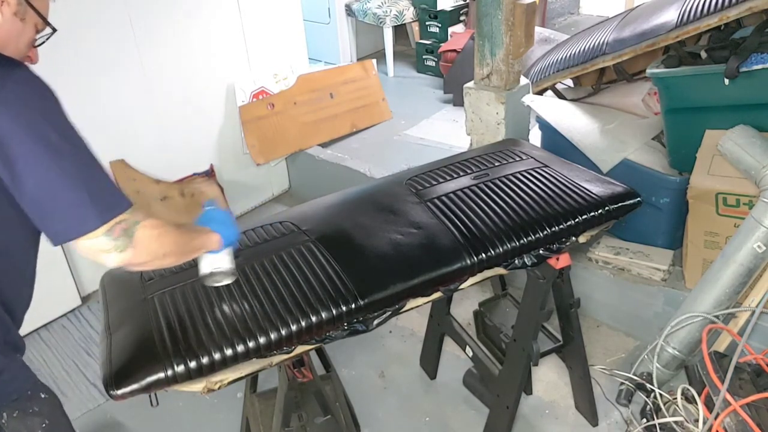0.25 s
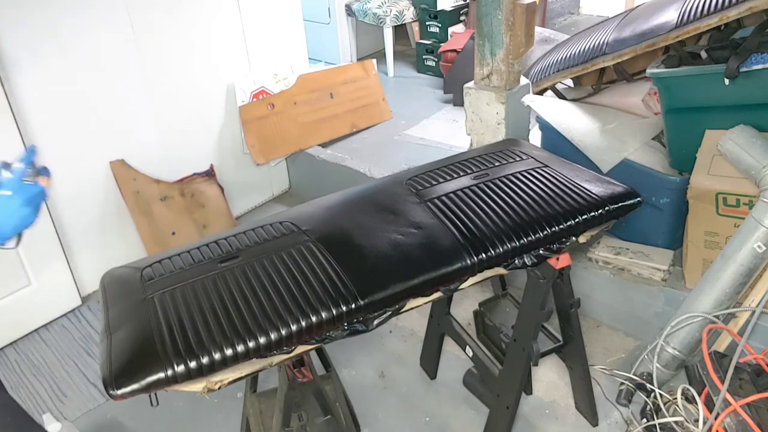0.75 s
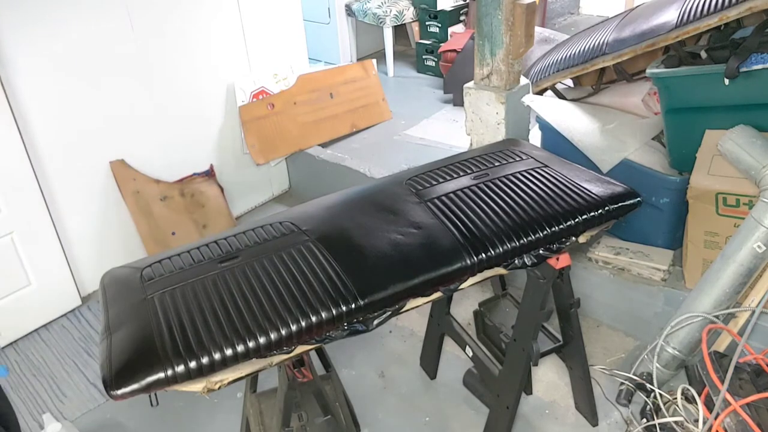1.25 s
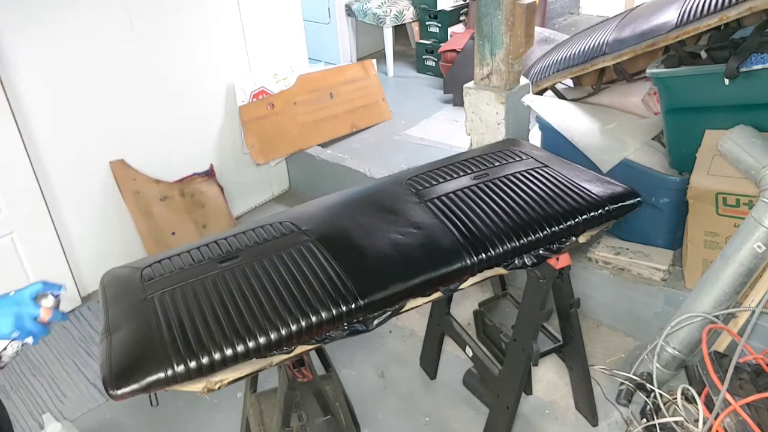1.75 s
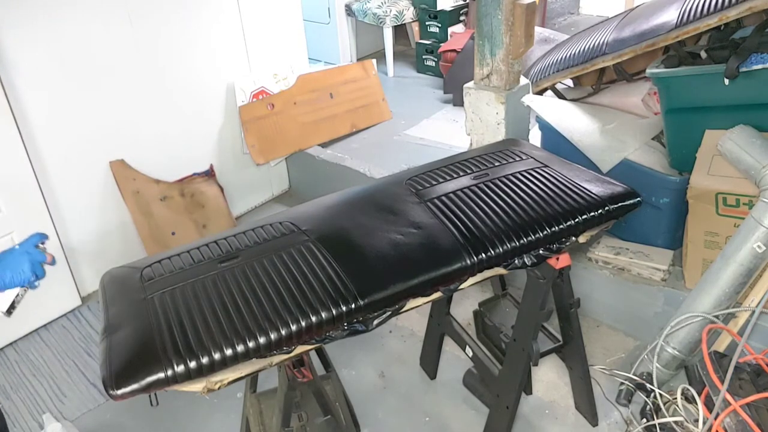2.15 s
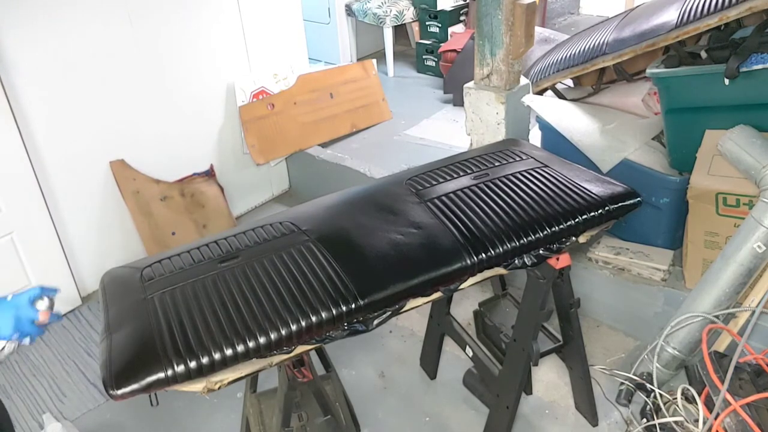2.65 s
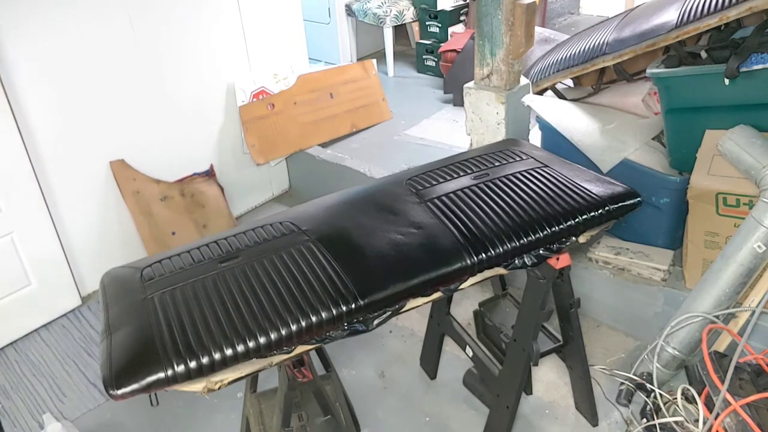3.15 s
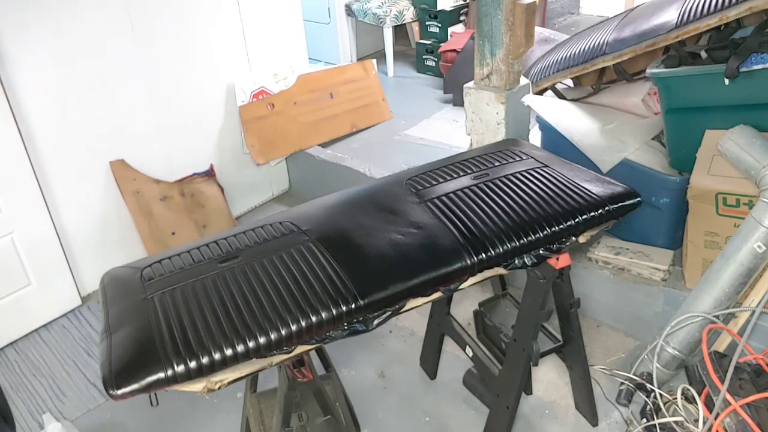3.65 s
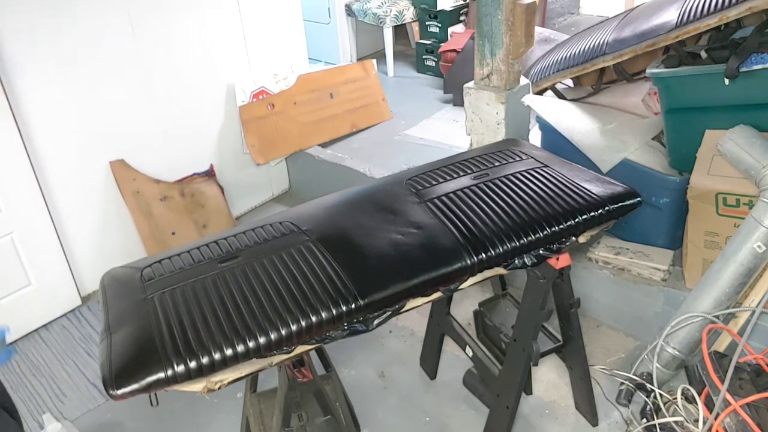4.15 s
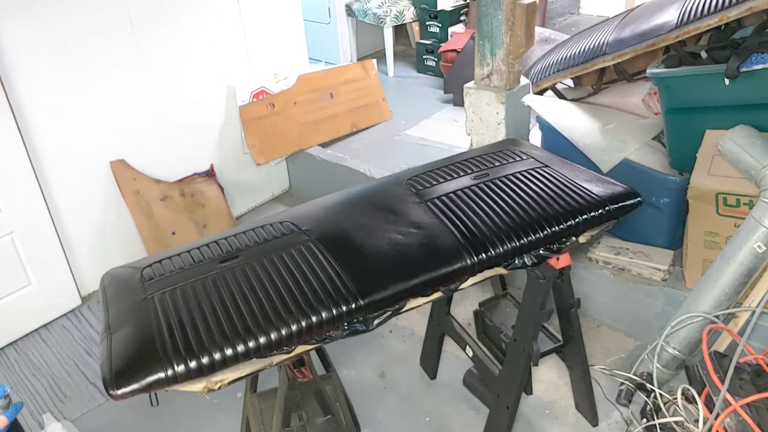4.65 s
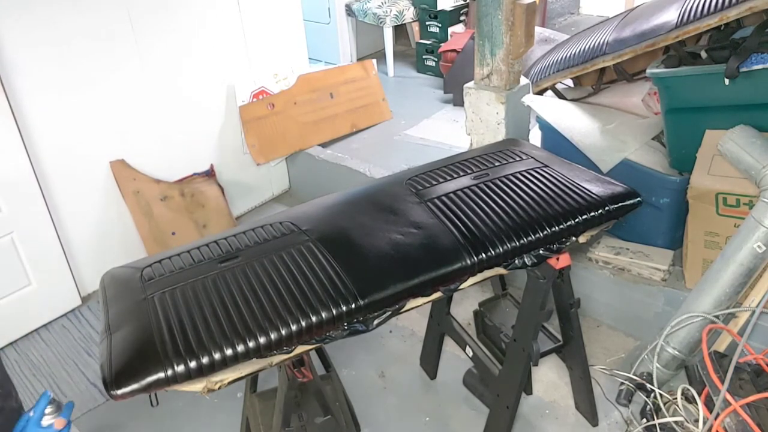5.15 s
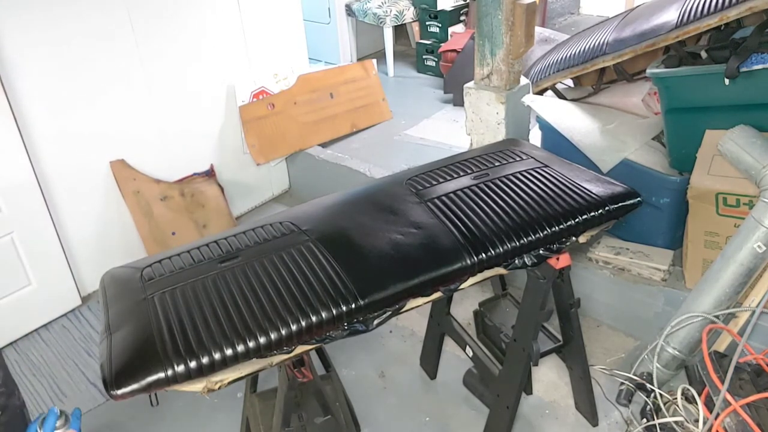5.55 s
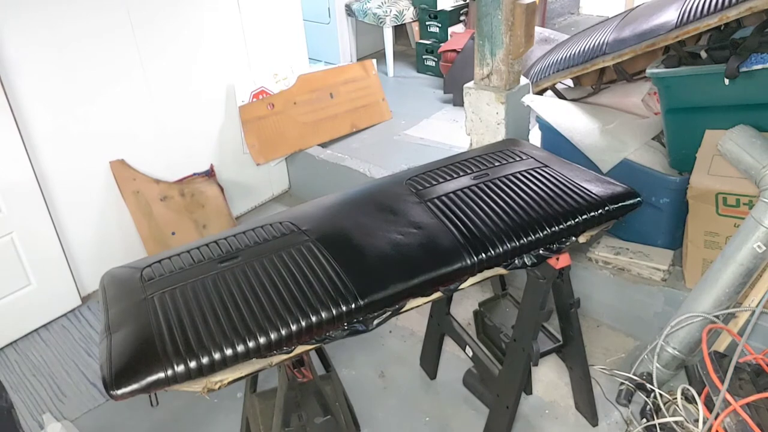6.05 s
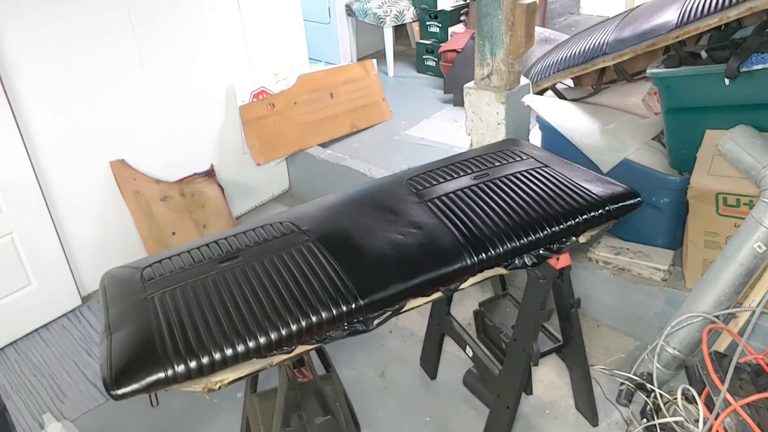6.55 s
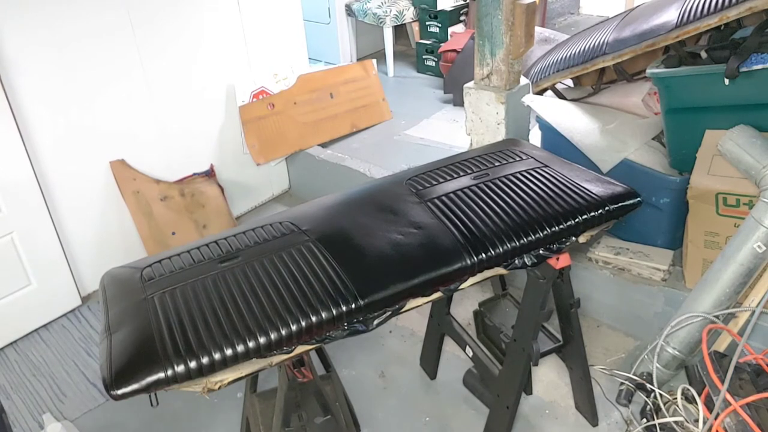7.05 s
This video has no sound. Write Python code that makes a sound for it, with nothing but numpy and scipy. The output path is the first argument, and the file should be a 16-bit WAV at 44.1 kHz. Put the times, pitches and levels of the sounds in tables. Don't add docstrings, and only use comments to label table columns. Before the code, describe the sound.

A garage with faint mains hum, low rumble and barely audible steps, heard through a small stereo camera microphone whose noise suppression makes pauses very quiet. The tail of a spray burst cuts off at once, then a short, bright hiss runs from 0.2 to 0.4 seconds. From about 0.8 to 1.75 the can is shaken: the mixing ball strikes steel with sharp clacks, loudest near 0.9 and 1.2, with brief ringing, sloshing paint and tight wall echoes. A long turbulent spray overlaps the last knocks, 1.5 to 2.2, then a stronger one swells from 2.4 to 2.9. Lighter, irregular rattles follow from 3.2 to 4.2, with one firm late knock at 4.6 and soft rubs. Near silence until 5.85, then three crisp short sprays, each about 0.2 seconds, at 5.9, 6.3 and 6.7. Quiet with a trace of slosh to 7.3.

```python
import sys
import numpy as np
from scipy import signal
from scipy.fft import rfft, irfft
from scipy.io import wavfile
from scipy.ndimage import uniform_filter1d, map_coordinates

SR = 44100
rng = np.random.default_rng(int(sys.argv[2]) if len(sys.argv) > 2 else 0)


def master(y):
    cut = np.clip(np.atleast_2d(y).T, -1, 1)
    pcm = np.round(cut * 32767)
    wavfile.write(sys.argv[1], SR, pcm.astype(np.int16))


def volts_from_db(level):
    exponent = np.asarray(level, float) / 20
    return 10 ** exponent


N = 322365

# opening in seconds, shutting in seconds, full jet level in dB,
# valve travel in seconds, pressure build-up in seconds.
NOZZLE_PRESSES = [
    (-.3, 0.017, -32, .01, 0.044),
    (0.174, 0.409, -27, 0.014, 0.12),
    (1.506, 2.196, -28.5, 0.0053, 0.031),
    (2.361, 2.884, -26, .012, 0.2),
    (5.867, 6.061, -29.5, 0.0034, .03),
    (6.27, 6.469, -30, 0.0054, 0.037),
    (6.68, 6.88, -30, 0.014, 0.048),
]
# frequency in Hz, density in dB per Hz.
JET_DB_PER_HZ = [(1760, -43.5), (3000, -17), (3360, -16), (4510, -8.5), (5790, -7), (6180, -7), (7480, 1),
                 (8290, -3.5), (9340, -10), (11000, -18.5), (14300, -59.5), (22000, -120)]
# frequency in Hz, density in dB per Hz.
JET_BODY_DB_PER_HZ = [(150, -53), (250, -30), (348, -26.5), (969, -16.5), (1530, -9), (2090, -1.5),
                      (3200, 1.5), (4160, -9.5), (7040, -120)]
# frequency in Hz, density in dB per Hz.
FIZZ_DB_PER_HZ = [(6200, -36.5), (10500, 3.5), (13200, 1.5), (15700, -1), (17000, -6)]
# time in seconds, peak in dB, can body re peak in dB, wall ring re peak in dB,
# left-right difference in dB.
BALL_KNOCKS = [(0.7915, -15, -3.5, -24, -3), (0.9011, -6.5, -9, 1, -1), (1.0257, -20, -9.5, -18, -9),
               (1.1825, -6, -6, 0.5, -2), (1.249, -27.5, -2, -6, -2.5), (1.288, -23, -14, -11.5, -24),
               (1.3555, -11, -13.5, -0.5, -6), (1.4218, -16, -33.5, -23, -10), (1.4631, -17, -30, -13, -3),
               (1.5398, -13, -11, -28, 2), (1.736, -26.5, -28, -19, -1), (3.1843, -16.5, -8, -4, -1),
               (3.4191, -32.5, 1.5, -28.5, 15), (3.67, -36, 1, 8, 0), (3.7245, -14, -13, -12, -3),
               (3.7804, -27.5, 1, -29, -12), (3.8554, -54, 17, 5, -12), (3.8987, -65, 21, -2.5, -1),
               (4.0105, -26, -3, 3, -1), (4.1058, -45.5, 20.5, 6, -3), (4.212, -50, -27, 10.5, 10),
               (4.5826, -13, -7, -18, -5), (5.0848, -60, -19.5, -18, -10)]
# delay in ms, level in dB.
ECHOES = [(1.9, -14.5), (2.6, -8.5), (4.2, -5), (6.4, -14), (9.5, -13.5), (13, -14.5), (19.5, -14)]
# time in seconds, rim zone in dB, can body re rim in dB,
# wall ring re rim in dB, fade in dB per second.
CONTACT_WASHES = [(.903, -19.5, -7.5, -9.5, 68), (1.028, -29, -5.5, -10.5, 149),
                  (1.185, -20, -6.5, -3.5, 261), (1.248, -29, -2, -10, 202), (1.289, -24.5, -0.5, -8, 65),
                  (1.355, -22, -12, -7, 243.5), (1.423, -31, -25, -9.5, 414), (1.465, -34, -18, -14, 411),
                  (1.543, -30.5, -3.5, -5, 304), (1.736, -30, -6.5, 0, 310),
                  (3.183, -28.5, -14.5, -5.5, 200), (3.419, -46.5, 4.5, -3, 236), (3.67, -32, 3, -4, 236),
                  (3.728, -30.5, -6, -9, 243), (3.78, -36.5, 5, -3.5, 321), (3.857, -53, 12, 1.5, 147),
                  (4.012, -34.5, -1.5, -3, 292), (4.104, -49.5, 6, 1.5, 274),
                  (4.214, -58.5, 6.5, 10.5, 251), (4.583, -26, -14.5, -16, 250),
                  (4.767, -58.5, 3.5, -5, 148), (3.029, -55.5, -9, 1.5, 211),
                  (5.084, -72.5, -19, -20, 250.5)]
# start in seconds, end in seconds, rim zone in dB,
# can body re rim in dB, wall ring re rim in dB.
PAINT_SLIDES = [(0.488, 0.595, -59, -6, 0.5), (0.7, 0.764, -40.5, -16.5, -8.5),
                (0.803, 0.903, -32, -8.5, -9.5), (1.043, 1.164, -38, -13.5, -12.5),
                (2.984, 3.04, -56, -2, -3.5), (1.55, 1.896, -52.5, 7, 11.5), (3.146, 3.18, -57, -2.5, -2.5),
                (2.95, 3, -59.5, -20.5, -10), (3.219, 3.305, -34.5, -9, -5.5), (3.35, 3.385, -57, -10, -11),
                (3.442, 3.445, -44, -7.5, -9.5), (4.188, 4.216, -61, 9, -7), (4.24, 4.265, -61, 9.5, 3.5),
                (4.684, 4.762, -63, -5, -7), (5.743, 5.787, -73, -8, 7.5),
                (5.827, 5.87, -61.5, -11.5, -3.5), (7.019, 7.104, -59, -2.5, -3)]
# start in seconds,
# end in seconds, level in dB, fall in dB per second.
DULL_RUBS = [
    (0.294, 0.44, -60.5, 400),
    (2.755, 2.91, -69.5, 398.5),
    (1.355, 1.362, -44.5, 497),
    (3.78, 3.78, -46.5, 357),
    (4.59, 4.638, -56, 300),
    (4.708, 4.805, -59, 118),
]
# frequency in Hz, density in dB per Hz.
RIM_DB_PER_HZ = [(3300, -33.5), (5600, -2.5), (6300, 2.5), (7400, 3), (8300, -2), (10300, -8.5),
                 (12000, -24), (14000, -32), (16000, -35)]
# frequency in Hz, density in dB per Hz.
BODY_DB_PER_HZ = [(560, -27.5), (1000, -11), (1250, -3.5), (1660, -7), (2080, -4.5), (2550, -4.5),
                  (3600, -32.5), (6200, -100)]
# frequency in Hz, density in dB per Hz.
THUD_DB_PER_HZ = [(100, -37.5), (200, -20.5), (330, -5), (480, 2), (700, 5.5), (950, -3), (1300, -30.5),
                  (2500, -79.5)]
# centre in Hz, width in Hz.
WALL_RINGS = [(3600, 490), (4100, 600), (4700, 1000), (5300, 1100)]
# time in seconds, centre in Hz.
GRIP_HZ = [(.5, 4880), (.88, 4550), (.91, 4900), (1.04, 4200), (1.17, 4330), (1.191, 4870), (1.288, 3900),
           (1.359, 4720), (1.47, 4250), (3, 4200), (3.2, 4710), (3.45, 4360), (3.75, 4320), (3.9, 3380),
           (4.02, 4650), (4.25, 4630), (4.8, 3940), (5.8, 4150)]
# centre in Hz, width in Hz.
BELLY_RINGS = [(1150, 320), (1660, 310), (2550, 170)]
# time in seconds, centre in Hz.
FINGERS_HZ = [(.6, 1670), (1.1, 1660), (3.099, 1700), (3.25, 1820), (3.4, 1200), (3.5, 1220), (3.65, 1673),
              (3.759, 1427), (3.95, 1550), (4.01, 2320), (4.301, 2550), (4.55, 1690), (7.3, 1910)]
# frequency in Hz, level in dB, t60 in seconds.
STEEL_MODES = [(344, -11.5, .09), (482.4, -7, 0.075), (1290, -5.5, 0.071), (1676, 1.5, 0.059),
               (1820, -2.5, 0.081), (2550, -5.5, .07), (3930, -5.5, 0.061), (4330, -4, .06),
               (4840, -3, .05)]
# time in seconds, level in dB.
HARD_CONTACTS = [
    (0.9025, -31),
    (1.1842, -37),
    (1.288, -38),
    (1.3566, -30),
    (3.67, -40),
    (3.779, -43),
    (4.0117, -55),
    (4.2117, -58.5),
    (4.5805, -38),
]
# frequency in Hz, level in dB rms.
HUM_PARTIALS = [(59.8, -78), (119.8, -66.5), (239.6, -82)]
# frequency in Hz, density in dB per Hz.
RUMBLE_DB_PER_HZ = [(12, -48), (20, -10), (64, -3.5), (91, -21), (109, -5), (201, -21), (242, -27.5),
                    (400, -28.5), (520, -63), (880, -120)]
# time in seconds, level in dB.
STEPS = [(1.4, -60), (2.179, -55), (2.56, -55.5), (3.25, -57.5), (4.05, -61), (5.09, -62), (5.95, -60),
         (6.9, -63)]
# frequency in Hz, density in dB per Hz.
SLAB_DB_PER_HZ = [(12, -30), (30, -4), (55, 1), (80, -14), (130, -45), (300, -100)]
# time in seconds, level in dB.
HISS_LEFT_DB = [(0, -78), (2.3, -71.5), (3.55, -71), (4.4, -76.5), (5.3, -78), (7.31, -77.5)]
# frequency in Hz, density in dB per Hz.
HISS_DB_PER_HZ = [(120, -45.5), (240, -10), (330, -12.5), (600, -17.5), (2000, -24), (5000, -28.5),
                  (6300, -23.5), (7500, -18.5), (8700, -26), (11000, -31.5), (16000, -34.5)]

LAG = 11
VALVE_DB, BUILD_DB = 32, 14
SHUT_DB_PER_S, SAG_DB, SAG_S = 439, 1.5, 0.041
LOW_RE_JET_DB, BODY_LINGERS = -17, 0.31
FIZZ_RE_JET_DB, FIZZ_LOSS_DB_PER_DB = -12.5, 0.34
ROLL_DB, ROLL_DB_PER_S = -19.5, 651
CURL_DB_PER_S2 = 900.5
FADE_SPEEDS = [[1], [0.83], [0.87], [0.72]]
THUD_RE_BODY_DB = -18
SLIDE_RISE_DB_PER_S, SLIDE_SAG_DB_PER_S, SLIDE_FALL_DB_PER_S = 650, 13, 400
RUMBLE_DB, STEP_S = -67.5, 0.0677
OPENS_DB_PER_DB, OPEN_S = 0.15, 0.15
TOP_HZ = 15850


def spray():
    jet, low, top = pressure() * volts_from_db(0.23 * wobble(60) + 0.23 * wobble(15))
    hiss = volts_from_db(3.5) * jet * coloured(grain(0.13, 4.5), JET_DB_PER_HZ) * volts_from_db([[-1.9], [1.9]])
    body = volts_from_db(4.5) * low * coloured(grain(0.54, 8.0), JET_BODY_DB_PER_HZ)
    fizz = volts_from_db(5.5) * top * coloured(grain(0.28, 4.5), FIZZ_DB_PER_HZ) * volts_from_db([[-1.4], [1.4]])
    return hiss + body + fizz


def pressure():
    t, gains = control_times(), 0
    for opens, shuts, db, valve_s, build_s in NOZZLE_PRESSES:
        since = np.maximum(t - opens, 0)
        weak = VALVE_DB * np.exp(-since / valve_s) + BUILD_DB * np.exp(-since / build_s)
        weak = weak + SAG_DB * np.exp(np.minimum(t - shuts, 0) / SAG_S)
        shut = SHUT_DB_PER_S * np.maximum(t - shuts, 0)
        jet = db - weak - shut
        low = jet + LOW_RE_JET_DB + BODY_LINGERS * np.minimum(shut, 30) - 0.17 * np.minimum(weak, 15)
        fizz = jet + FIZZ_RE_JET_DB - FIZZ_LOSS_DB_PER_DB * np.minimum(weak + shut, 25)
        gains = gains + (t > opens) * volts_from_db([jet, low, fizz])
    return full_rate(gains)


def knocks():
    drive = np.zeros((3, 2, N + SR))
    for s, db, body_db, wall_db, pan_db in BALL_KNOCKS:
        zone_db = np.reshape([5.5, body_db + 7.0, wall_db + 7.5], (3, 1))
        for delay_ms, echo_db in [(0, 0)] + list(ECHOES):
            size = volts_from_db(db + echo_db + rng.normal(0, 0.73, (3, 2)) + zone_db)
            left, right = round((s + delay_ms / 1000) * SR) + rng.integers(-8, 9, 2)
            drive[:, 0, left + LAG] += size[:, 0] * volts_from_db(pan_db / 2)
            drive[:, 1, right] += size[:, 1] * volts_from_db(-pan_db / 2)
    t = np.arange(110) / SR
    spread = signal.chirp(t, 12500, t[-1], 600) * np.hanning(len(t)) ** 0.4
    spread = spread / np.linalg.norm(spread)
    rim, body, wall = signal.fftconvolve(drive, spread[None, None], axes=2)[..., :N]
    return coloured(rim, RIM_DB_PER_HZ) + coloured(body, BODY_DB_PER_HZ) + ring(wall, WALL_RINGS, GRIP_HZ)


def steel():
    out, t = np.zeros((2, N + SR)), np.arange(SR // 4) / SR
    hz, level_db, t60_s = np.transpose(STEEL_MODES)[:, :, None]
    for s, db in HARD_CONTACTS:
        strength, detune, phase = rng.standard_normal((3, len(STEEL_MODES), 1))
        size = volts_from_db(db + level_db + 3 * strength - 60 * t / t60_s) * (1 - np.exp(-t / 0.0011))
        angle = 2 * np.pi * hz * (1 + 0.016 * detune) * t
        for port in (0, 1):
            out[port, round(s * SR):][:len(t)] += (size * np.sin(angle + port * phase)).sum(0)
    return out[:, :N]


def slosh():
    rim, body, wall, thud = handling() * unit(volts_from_db(0.5 * wobble(300) + 0.2 * wobble(40)))
    rim = rim * coloured(grain(0.35, 5.0), RIM_DB_PER_HZ) * volts_from_db([[-1.3], [1.3]])
    wall = wall * ring(grain(0.35, 5.0), WALL_RINGS, GRIP_HZ)
    belly = grain(0.4, 3.5)
    belly = coloured(belly, BODY_DB_PER_HZ) + ring(belly, BELLY_RINGS, FINGERS_HZ)
    thud = volts_from_db(-0.5) * thud * coloured(grain(0.54, 5.0), THUD_DB_PER_HZ)
    return volts_from_db(2.5) * (rim + wall + volts_from_db(-4.5) * body * belly + thud)


def handling():
    t, power = control_times(), 0

    def zones(db, body_db, wall_db):
        return db + np.array([[0], [body_db], [wall_db], [body_db + THUD_RE_BODY_DB]])

    for s, db, body_db, wall_db, fade in CONTACT_WASHES:
        since = np.clip(t - s, -0.2, 0.5)
        before = ROLL_DB + ROLL_DB_PER_S * since
        after = -(fade * since + CURL_DB_PER_S2 * since ** 2) * FADE_SPEEDS
        power = power + volts_from_db(zones(db, body_db, wall_db) + np.where(since < 0, before, after)) ** 2
    for start, end, db, body_db, wall_db in PAINT_SLIDES:
        power = power + volts_from_db(zones(db, body_db, wall_db) + plateau(t, start, end, SLIDE_FALL_DB_PER_S)) ** 2
    for start, end, db, fall in DULL_RUBS:
        power[3] += volts_from_db(db + plateau(t, start, end, fall)) ** 2
    return full_rate(np.sqrt(power))


def plateau(t, start, end, fall_db_per_s):
    rise = SLIDE_RISE_DB_PER_S * np.maximum(start - t, 0)
    sag = SLIDE_SAG_DB_PER_S * np.clip(t - start, 0, end - start)
    return -rise - sag - fall_db_per_s * np.maximum(t - end, 0)


def ring(x, modes, held):
    centre_hz = np.interp(np.arange(N) / SR, *np.transpose(held))
    where = np.interp(centre_hz, [hz for hz, _ in modes], range(len(modes)))
    out = 0
    for k, (hz, width) in enumerate(modes):
        skirt = [(hz / 3, -45), (hz - 2 * width, -17), (hz - width / 2, -4), (hz, 0),
                 (hz + width / 2, -4), (hz + 2 * width, -16), (hz * 3, -60)]
        out = out + np.sqrt(np.clip(1 - abs(where - k), 0, 1)) * coloured(x, skirt)
    return out


def garage(opening):
    t = np.arange(N) / SR
    hum = 0
    for hz, db in HUM_PARTIALS:
        hum = hum + volts_from_db(db - 2.5 + 4.4 * wobble(18)) * np.sin(2 * np.pi * hz * t + 0.6 * wobble(14))
    swell = volts_from_db(RUMBLE_DB + 3 * wobble(2.9))
    steps = sum(volts_from_db(db) * np.exp(-((t - s) / STEP_S) ** 2) for s, db in STEPS)
    low = rng.standard_normal(N) + 0.16 * rng.standard_normal((2, N))
    rumble = swell * unit(coloured(low, RUMBLE_DB_PER_HZ))
    rumble = rumble + steps * unit(coloured(low[:, ::-1], SLAB_DB_PER_HZ))
    hiss_gain = volts_from_db(np.interp(t, *np.transpose(HISS_LEFT_DB)) + wobble(4.5))
    hiss = hiss_gain * coloured(patchy(rng.standard_normal((2, N)), 4.5), HISS_DB_PER_HZ)
    return opening * (hum + rumble) + hiss


def grain(direct, patchy_db):
    return patchy(ports(direct), patchy_db)


def ports(direct):
    straight, *rest = rng.standard_normal((3, N))
    both = np.array([np.roll(straight, LAG), straight])
    return np.sqrt(direct) * both + np.sqrt(1 - direct) * np.array(rest)


def patchy(x, patchy_db):
    z = signal.stft(np.float32(x), nperseg=1024)[2]
    field = np.float32(rng.standard_normal(z.shape))
    field = unit(uniform_filter1d(uniform_filter1d(field, 2, 1), 8, 2))
    field = field - 0.6 * np.minimum(field + 0.7, 0) ** 2
    return unit(signal.istft(z * np.float32(volts_from_db(patchy_db * field)), nperseg=1024)[1][:, :x.shape[1]])


def coloured(x, points):
    gain = np.maximum(volts_from_db(along(points, np.fft.rfftfreq(4096, 1 / SR))), 1e-3)
    cepstrum = irfft(np.log(gain))
    cepstrum[1:2048] *= 2
    cepstrum[2049:] = 0
    h = irfft(np.exp(rfft(cepstrum)))
    h = h[:64 + np.searchsorted(np.cumsum(h ** 2), (1 - 1e-6) * h @ h)]
    h = (h / np.linalg.norm(h)).astype(x.dtype)
    return signal.oaconvolve(x, h.reshape((1,) * (x.ndim - 1) + (-1,)), axes=-1)[..., :x.shape[-1]]


def along(points, hz):
    f, v = np.transpose(points)
    return np.interp(np.log(hz + 1), np.log(f + 1), v)


def wobble(rate_hz):
    knots = rng.standard_normal(int(N * rate_hz / SR) + 4)
    return map_coordinates(knots, [np.arange(N) * rate_hz / SR])


def unit(x):
    return x / np.sqrt(np.mean(x ** 2) + 1e-20)


def control_times():
    return np.arange(0, N, 16) / SR


def full_rate(gains):
    return np.array([np.interp(np.arange(N) / SR, control_times(), g) for g in gains])


def scene():
    can = spray() + slosh() + knocks()
    power = uniform_filter1d((can ** 2).mean(0), round(OPEN_S * SR))
    loud_db = 10 * np.log10(abs(power) + 1e-7)
    return can + garage(volts_from_db(OPENS_DB_PER_DB * (loud_db + 41))) + steel()


def low_pass(x):
    return signal.sosfilt(signal.butter(12, 17030, fs=SR, output="sos"), x)


def record(dry):
    soft = dry / (1 + np.abs(dry / 0.88) ** 5) ** (1 / 5)
    band = np.clip((TOP_HZ - np.fft.rfftfreq(N, 1 / SR)) / 150, 0, 1)
    return low_pass(irfft(rfft(soft) * band, N))


dry = scene()
out = record(dry)
master(out)
```